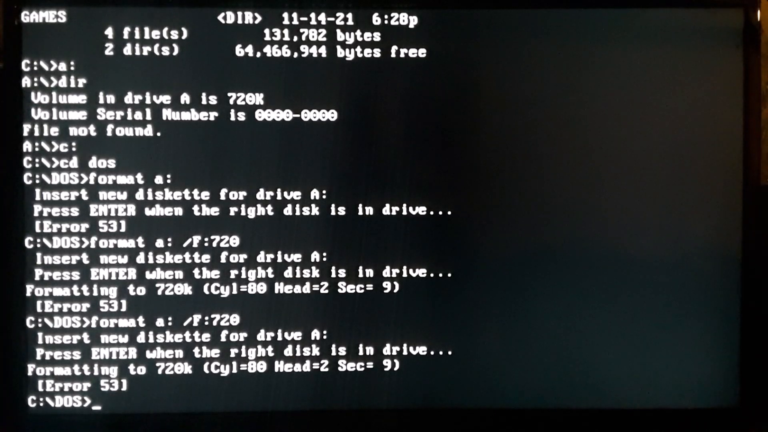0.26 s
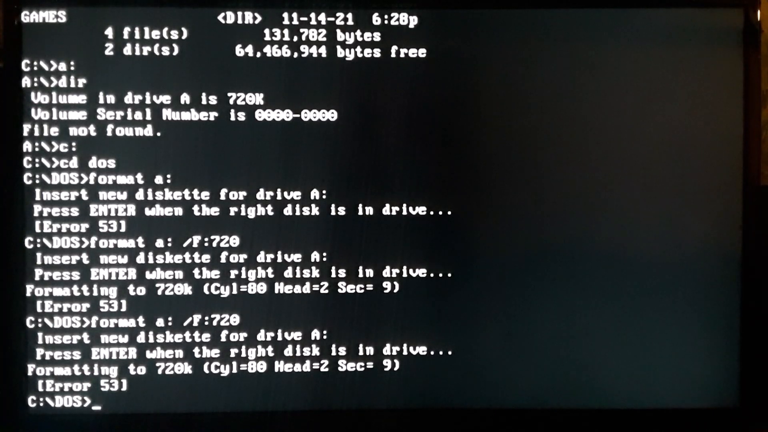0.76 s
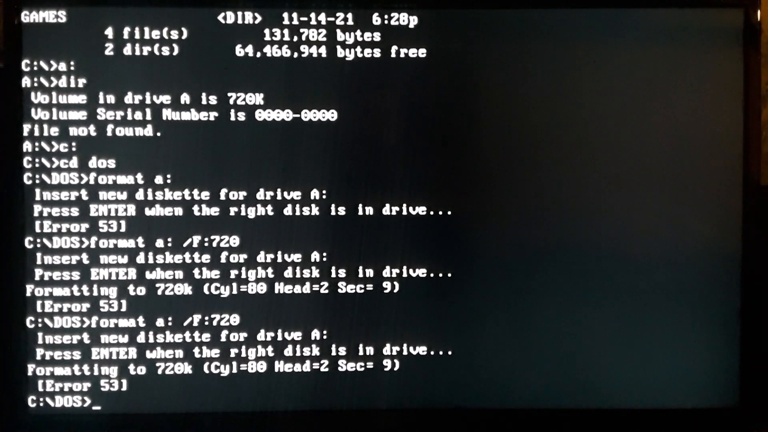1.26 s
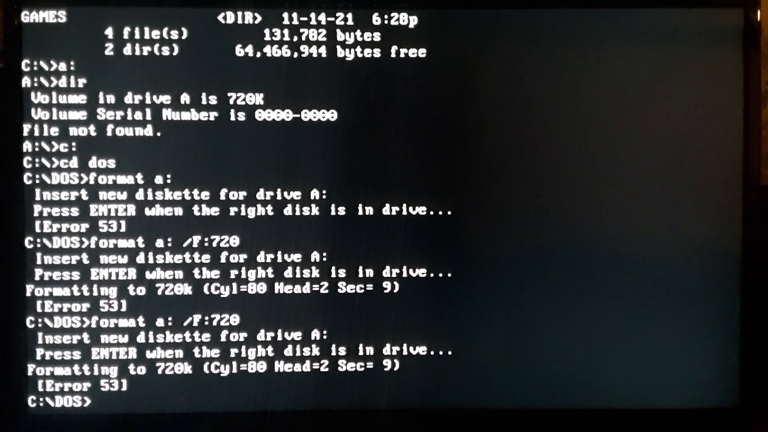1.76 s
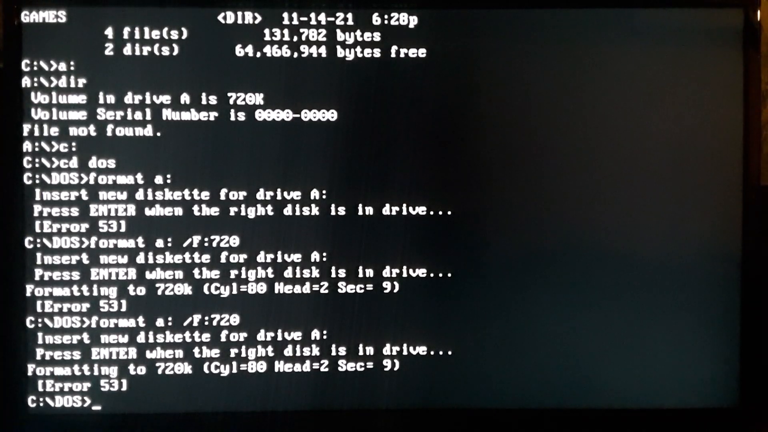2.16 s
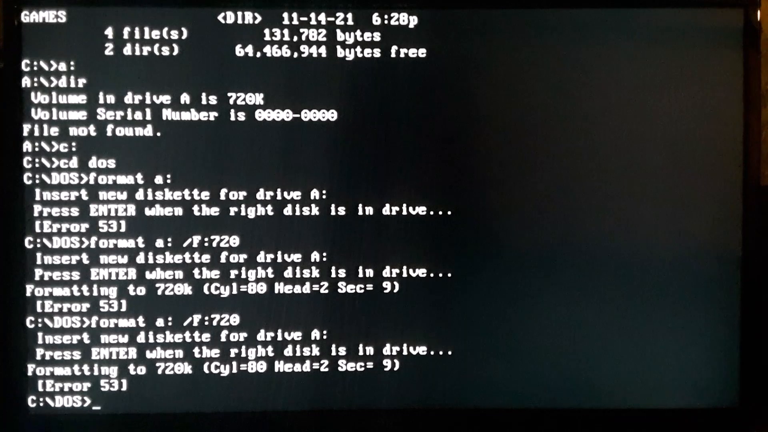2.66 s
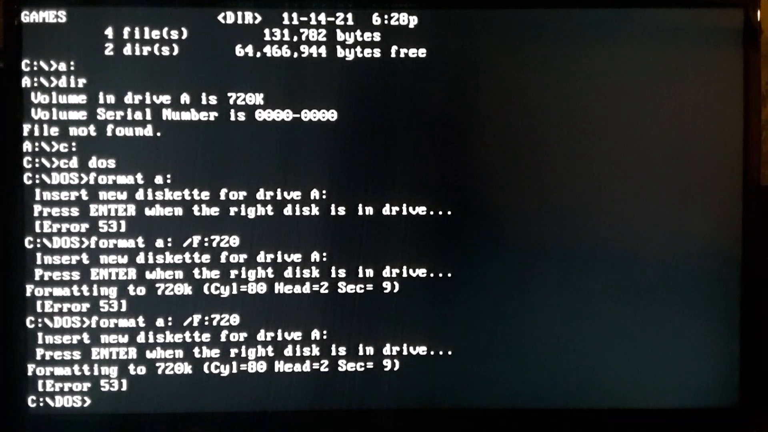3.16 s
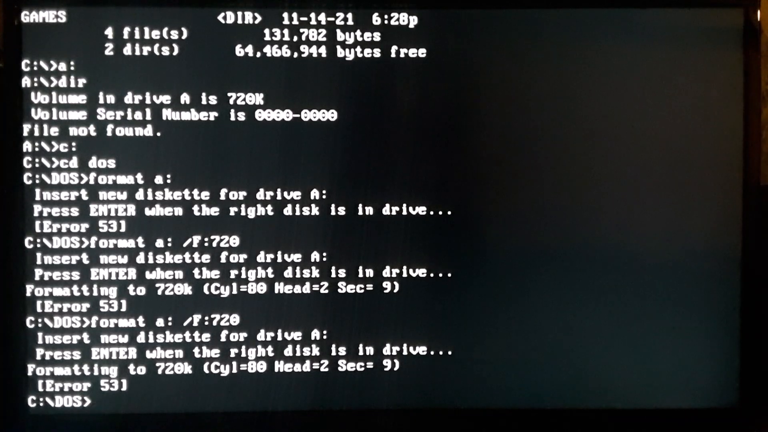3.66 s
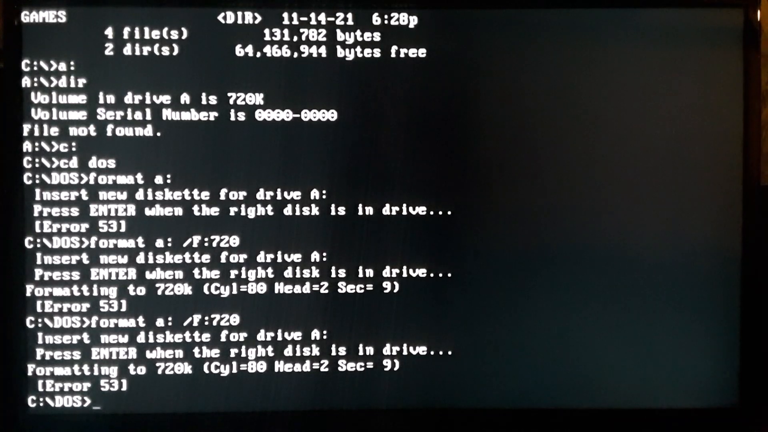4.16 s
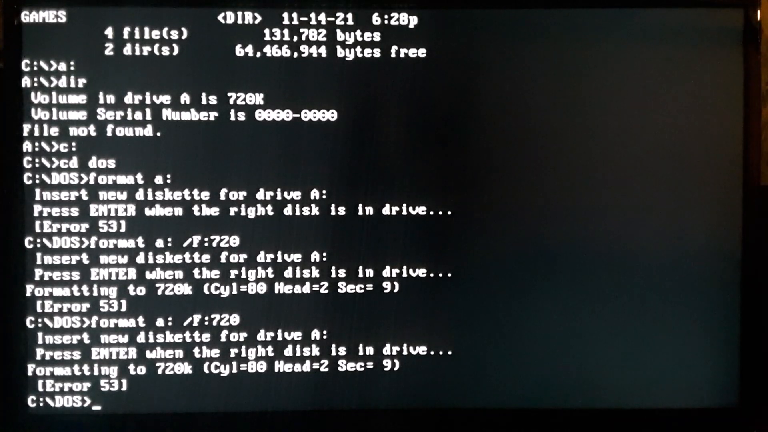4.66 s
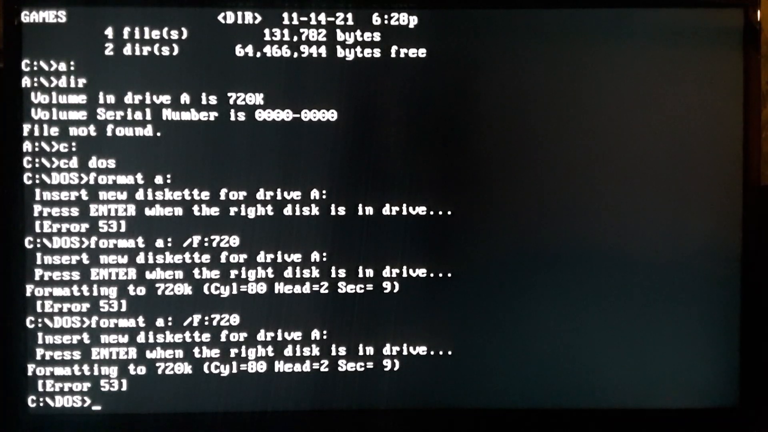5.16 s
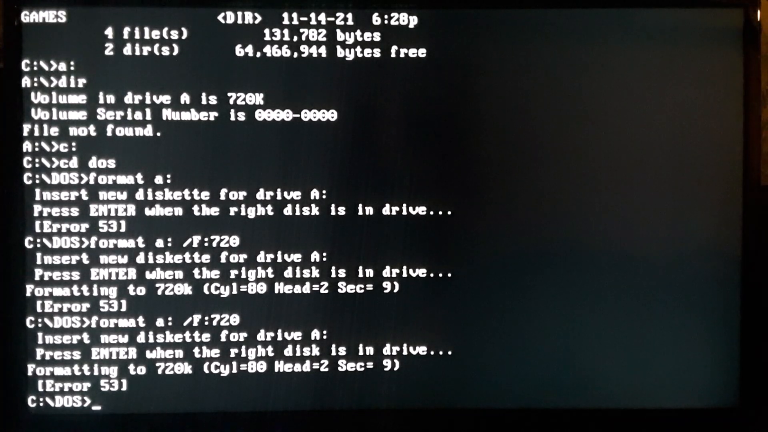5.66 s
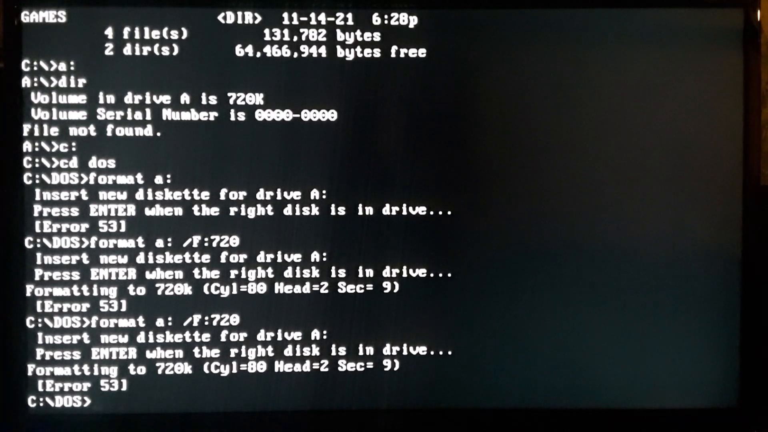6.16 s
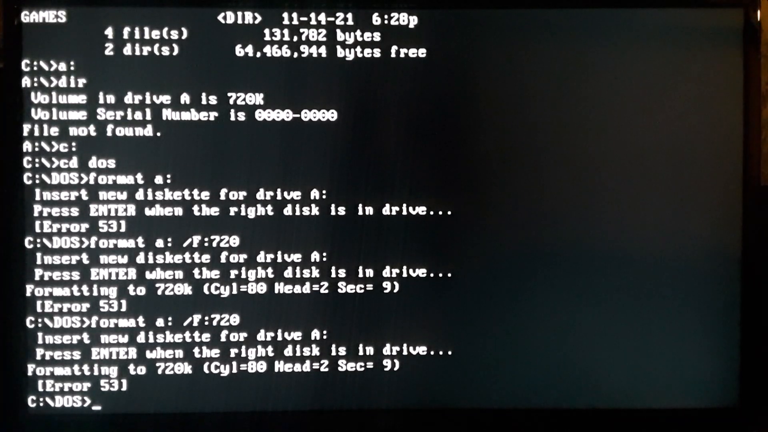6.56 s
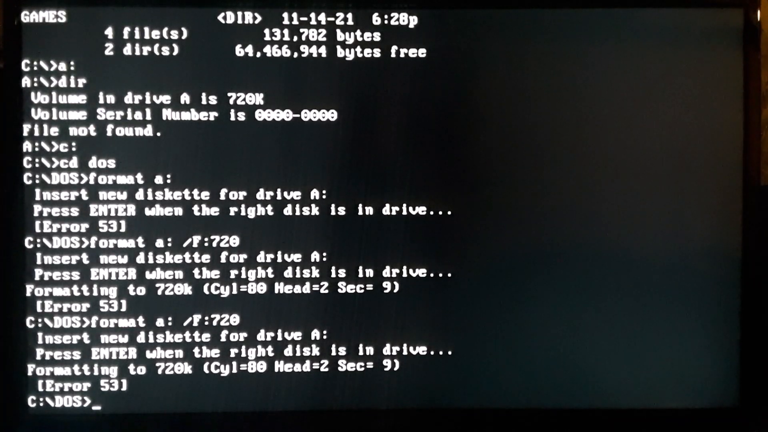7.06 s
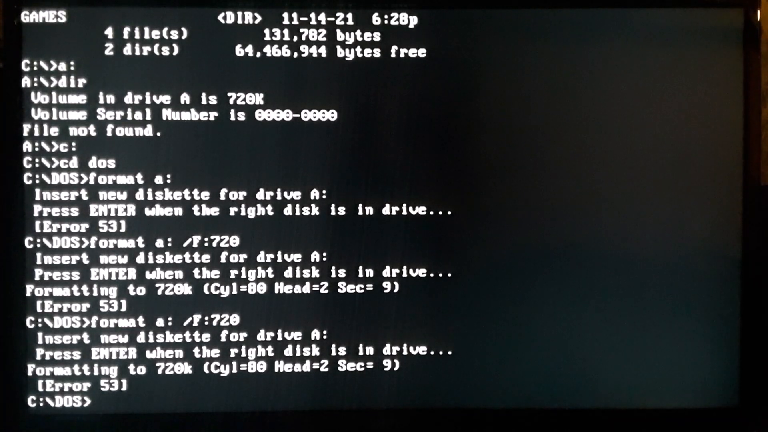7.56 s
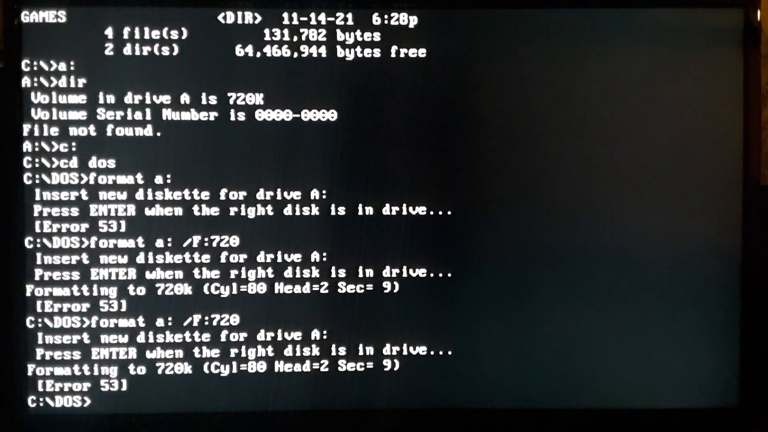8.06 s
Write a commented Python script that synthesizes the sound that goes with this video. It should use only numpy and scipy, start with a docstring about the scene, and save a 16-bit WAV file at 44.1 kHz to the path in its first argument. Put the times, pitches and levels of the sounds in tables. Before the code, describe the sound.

In a small room with a faint computer fan hum, a floppy drive snaps and releases its disk. The plastic shell is handled with separate clicks, light rubbing and dull bumps on the desk. Knocks and sliding grow busier as it goes back in, ending in a firm latch clack, the loudest sound, and a last small tick. Two spaced microphones place the drive a little to the right.

```python
"""A light click, then the sharp snap of a latch: a plastic floppy disk is ejected from a drive on a desk.
It is handled and pushed back in. Latches and edges knock in bursts of tiny impacts, plastic slides on
plastic and fingers in dense slips, and both excite the modes of drive case and disk shell.
The desk carries soft bumps, the small room reverberates and a computer fan hums below.
Two spaced microphones receive the sound; the drive stands nearer the right one."""
import sys
import numpy as np
from scipy import signal
from scipy.io import wavfile

SR = 44100
rng = np.random.default_rng(int(sys.argv[2]) if len(sys.argv) > 2 else 0)


def inscribe(sig):
    """Save sig as 16-bit PCM at rate SR to the path in sys.argv[1].

    A 1-D sig is mono; a 2-D sig holds one channel per row.
    Samples are clipped to [-1, 1] before scaling.
    """
    pcm = np.round(np.clip(np.atleast_2d(sig).T, -1, 1) * 32767)
    wavfile.write(sys.argv[1], SR, pcm.astype(np.int16))


N = 366030

# six bands (thud, body, clack, snap, click, sheen): lower f/Hz, upper f/Hz
BANDS = [(200, 500), (500, 1300), (1300, 2400), (2400, 4300), (4300, 7500), (7500, 17000)]
# knocks and latch snaps: t/s, level/dB, low/dB, treble/dB, sheen/dB, left minus right/dB,
# rattle time constant/s, ring f/Hz; low, treble and sheen are offsets from the level
IMPACTS = [(0.052, -35, -6.5, -36.5, -41, -0.5, 0.0048, 920), (0.093, -56, 0, -29, -16, 4, 0.0025, 1680),
           (0.139, -54, -13, -4, -23, -1, 0.0029, 790), (0.2531, -20, -11.5, 1.5, -6.5, -5.5, 0.0041, 3350),
           (0.262, -26.5, 0, -10, -25, 5, 0.0048, 940), (0.3612, -39.5, 2, -6.5, -16, 0, 0.0038, 900),
           (0.4222, -40.5, 9, -22.5, -29.5, 0.5, 0.0029, 947), (0.4928, -48, 4, -13, -22, -6, 0.0014, 1960),
           (1.0373, -55, 2.5, 2, -15, 3, 0.004, 720), (1.0654, -38.5, -4, -1, -8.5, -3.5, 0.0037, 4180),
           (1.4108, -15.5, -6.5, -3, -6, 2.5, 0.0015, 3080), (1.816, -36, -18, -16, -26, 2, 0.0021, 2000),
           (1.8484, -31, -18, -20, -24, 4.5, 0.0034, 2050),
           (2.2667, -33.5, -10, -9, -18, 7.5, 0.0023, 1880),
           (2.3079, -25, -11.5, -12.5, -18, 7, 0.0042, 1900),
           (2.3198, -37.5, -4.5, -7, -15, -2, 0.012, 2120), (2.3794, -22.5, -7.5, 2, -7, 7, 0.0024, 2402),
           (3.4281, -43, -10.5, -20, -9.5, 10.5, 0.002, 824),
           (4.0923, -70, 18.5, -17, -19, -5.5, 0.0038, 729),
           (4.3445, -45.5, -6, -5.5, -30.5, 1, 0.0073, 880),
           (4.4912, -43.5, 2, -21.5, -30, -2, 0.0079, 910), (4.5402, -42.5, -10, -19, -35, 2, 0.007, 870),
           (4.5695, -41.5, 3, -31, -36, 1, 0.0056, 2850),
           (4.673, -42.5, -3, -26.5, -40, -0.5, 0.0063, 1500),
           (4.8954, -48.5, -7, -12, -24.5, -3.5, 0.0077, 1170),
           (4.9624, -31.5, -12.5, -19, -39, 1, 0.0027, 1780),
           (5.001, -36.5, -6.5, -15.5, -27, -0.5, 0.0052, 3650),
           (5.2012, -54.5, -9, -18.5, -22, 1.5, 0.0053, 720),
           (5.5284, -39.5, -11, -13, -19.5, 5.5, 0.0048, 750),
           (5.54, -38.5, -11, -10.5, -18, -4, 0.0052, 2160), (5.5972, -34, -11, -21, -27, -2, 0.0096, 810),
           (5.6123, -36.5, -6, -15, -20, -3, 0.0052, 790), (5.8449, -48.5, 5, -19.5, -25, 0.5, 0.0087, 700),
           (5.9852, -60.5, -16, -0.5, -7, 0, 0.0053, 830), (6.2198, -58, -13, -4.5, -10, -1, 0.0048, 740),
           (6.2721, -45, -8, 5, -18, -4, 0.0043, 1900), (6.2913, -22, -13, -20.5, -28, 5, 0.0091, 790),
           (6.3025, -22.5, -7.5, -23.5, -27, -10.5, 0.0055, 886),
           (6.4622, -47.5, -19, -11, -21, 1, 0.0044, 2940), (6.546, -33, -14, -14, -26, 8, 0.0023, 2090),
           (6.6184, -45.5, -17, 9, -7, -2.5, 0.0037, 923), (6.7491, -40.5, -9, 3.5, -8, 0, 0.0032, 2070),
           (6.775, -31.5, -4.5, -16, -19, -1.0, 0.0031, 930),
           (6.9117, -51.5, -8, -9.5, -26, 6.5, 0.0057, 840),
           (7.2382, -11.5, -6.5, -6.5, -10.5, -3.0, 0.0049, 2870),
           (7.2483, -10.5, -6, -15.5, -18, -2, 0.0092, 1000),
           (7.2588, -19.5, -2, -14, -23, 2.5, 0.0072, 830),
           (7.666, -56.5, -4.5, -8, -20.5, -2.5, 0.004, 1916),
           (8.1733, -40, -16, -15, -22.5, 6, 0.0053, 1670)]
# sliding strokes: t/s, rise/s, hold/s, fall/s, level/dB, low/dB, treble/dB, sheen/dB, rasp f/Hz
FRICTION_STROKES = [(0.046, 0.047, 0.021, 0.17, -69.5, 12, -4, -22, 890),
                    (0.158, 0.06, 0.0099, 0.0047, -52.5, -9.5, -6.5, -12, 2000),
                    (0.213, 0.011, 0.037, 0.013, -41.5, -4.5, -3.5, -16, 880),
                    (0.364, .01, 0.056, 0.15, -60.5, 2.5, -9, -23, 890),
                    (0.475, 0.012, .002, .04, -55.5, -6.5, -9, -18, 2000),
                    (0.914, 0.045, .003, 0.13, -65.5, 0.5, -7.5, -14, 850),
                    (1.14, 0.097, 0.026, 0.018, -64, -6.5, -7, -27, 1940),
                    (1.235, 0.043, 0.1, 0.016, -48, -9, 4.5, -12, 3100),
                    (1.338, 0.027, 0.03, .012, -49.5, -13, 8, 5.5, 6550),
                    (1.738, 0.043, 0.013, 0.025, -59.5, -18, 11, 0.5, 2000),
                    (1.856, 0.013, .003, 0.086, -59, -17, 8, -1, 2120),
                    (1.884, 0.061, 0.313, .03, -67.5, -15, -10, -21, 2060),
                    (3.078, 0.052, 0.092, .03, -69, -8.5, 14, 7.5, 2000),
                    (3.182, 0.048, 0.0041, 0.094, -51.5, -16, 7, -3, 2620),
                    (3.209, 0.14, 0.068, 0.037, -63.5, -19, 10.5, 0.5, 6500),
                    (4.336, 0.0081, 0.0028, 0.33, -58, 6, -12, -24, 2000),
                    (4.49, 0.011, .003, 0.02, -55, -18, -18, -29, 2900),
                    (4.53, 0.016, .003, 0.39, -61, -8, -5.5, -28, 2000),
                    (4.663, 0.032, 0.0028, 0.16, -60, 0.5, -21, -28, 1900),
                    (4.754, 0.194, .003, .02, -67, 2, -4.5, -14, 1900),
                    (5.369, 0.053, .003, 0.1, -64.5, 7.5, -14.5, -16.5, 2070),
                    (5.491, 0.039, 0.065, .1, -56, -3.5, -5, -14, 2050),
                    (5.597, 0.084, 0.029, 0.21, -53, -0.5, -5.5, -17, 2140),
                    (5.916, .14, 0.0025, 0.07, -63.5, 4, -10.5, -11.5, 870),
                    (6.242, 0.053, 0.0054, 0.011, -40.5, -5.5, -7, -14, 1900),
                    (6.406, 0.083, .003, 0.064, -49.5, -7, -1, -11, 3020),
                    (6.515, 0.034, .003, 0.14, -44.5, -6.5, -9, -20, 1980),
                    (6.546, 0.032, 0.19, 0.094, -51.5, -8, 1, -11, 2960),
                    (6.803, .1, 0.039, 0.058, -65.5, 3, -12, -11.5, 2000),
                    (7.105, 0.12, 0.0024, .004, -57.5, -8, -10.5, -25, 2000)]
# colour common to all knocks: gain/dB in each band
IMPACT_COLOUR = [-9.5, -3, 1, -5, 3.5, 2]
# colour common to all strokes: gain/dB in each band
FRICTION_COLOUR = [-5, 1.5, 4, -5, -1.5, -1]
# weights of the low, treble and sheen offsets (rows) in each band (columns)
COLOUR_WEIGHTS = [[.9, 0.83, 0.15, 0.068, 0, 0], [0, 0.27, 0.18, 0.53, 0.77, 0], [0, 0, 0, 0, 0, 1]]
# shadowing at the left microphone: gain/dB in each band
LEFT_SHADOW = [-7.5, 0, -2, 0, -7.5, -3]
# modes of drive case and disk shell: f/Hz, gain/dB, T60/s
SHELL_MODES = [(333, -41, 0.014), (740, -33, 0.018), (918, -28, 0.021), (1002, -35.5, 0.049),
               (2076, -34, 0.0092), (2794, -37.5, 0.002), (4590, -55.5, 0.0027), (6160, -46, 0.0088)]
# bumps carried by the desk: t/s, level/dB, f/Hz, T60/s
DESK_BUMPS = [(0.257, -52, 150, 0.088), (1.414, -53.5, 138, 0.15), (2.382, -43.5, 101, 0.083),
              (2.569, -39.5, 149.5, 0.026), (2.812, -45.5, 85, 0.067), (2.834, -47, 112, 0.069),
              (3.037, -50.5, 235, 0.071), (3.43, -43, 302, 0.032), (4.096, -47.5, 130.6, 0.079),
              (4.096, -39, 403, 0.062), (5.619, -51, 135, 0.2), (6.302, -55, 142, 0.14),
              (7.253, -27, 328, 0.1), (7.27, -42, 134, 0.37)]
# soft squeaks: t/s, duration/s, f/Hz, level/dB
SQUEAK_TONES = [(.092, .035, 1700, -53), (.085, .05, 500, -52), (2.675, .11, 478, -53)]
# reverberation, one row a band: T60/s, gain/dB, left-right correlation
ROOM_DECAY = [(0.33, -3.5, 0.92), (.25, -3, 0.079), (0.27, -6, 0.04), (0.23, 2.5, 0.064), (0.2, -4.5, 0.07),
              (0.15, -1.5, 0.17)]
# air noise of the fan: f/Hz, relative spectral density/dB
FAN_SPECTRUM = [(15, -33.5), (30, -28.5), (70, -17), (200, -14.5), (370, -22.5), (600, -19), (900, -21.5),
                (1200, -30.5), (2000, -35.5), (3400, -40.5), (6000, -34.5), (7500, -50), (15000, -41.5),
                (17000, -44)]
# case resonances in the fan noise: f/Hz, bandwidth/Hz, level/dB
FAN_RESONANCES = [(210.7, 54, -75.5), (290, 25, -70), (757, 180, -63.5), (5657, 950, -76.5),
                  (1900, 340, -80.5)]
# fan noise at the two microphones: f/Hz, left-right correlation
FAN_CORRELATION = [(60, 0.54), (150, 0.95), (380, 0.77), (950, -0.11), (2380, 0.023), (5980, -0.087),
                   (15000, 0.95)]
# level of the whole background hum and hiss, sinking after the last loud snap: t/s, gain/dB
BACKGROUND_LEVEL = [(0, -1), (1.5, -3), (3, -1), (3.8, -2), (5, -1), (7.2, -1.5), (7.6, -4), (8.3, -7.5)]


def knocks():
    """Impact excitation: contacts build up, then die away exponentially. Force per band and side."""
    build_up_s, length = 0.0034, 3000
    force, t = np.zeros((6, 2, N + length)), np.arange(length) / SR
    for start, *colour_db, pan_db, rattle_s, hz in IMPACTS:
        envelope = np.where(t < build_up_s, (t / build_up_s) ** 2, np.exp((build_up_s - t) / rattle_s))
        rattle = envelope * micro_impacts(length, per_s=11000, spread_db=4.5)
        rattle = contact_resonance(rattle, hz, db=-25, t60=.009)
        sides = from_db([[pan_db / 2], [-pan_db / 2]])
        at = round((start - build_up_s / 2) * SR)
        force[:, :, at:at + length] += band_gains(*colour_db, IMPACT_COLOUR) * sides * rattle
    return force[..., :N]


def slides():
    """Sliding friction: dense slips under uneven pressure; each stroke swells, holds and fades."""
    uneven_db, fade_db = 2.2, 32
    force = np.zeros((6, 1, N))
    slips = micro_impacts(N, per_s=6000, spread_db=2.0) * from_db(uneven_db * drift(hz=36))
    for start, rise, hold, fall, *colour_db, hz in FRICTION_STROKES:
        corners = np.cumsum([0, rise, hold, fall]) * SR
        envelope = from_db(np.interp(np.arange(int(corners[-1])), corners, [-fade_db, 0, 0, -fade_db]))
        at = round(start * SR)
        span = slice(at, at + len(envelope))
        rasp = contact_resonance(envelope * slips[..., span], hz, db=-24.5, t60=0.0088)
        force[..., span] += band_gains(*colour_db, FRICTION_COLOUR) * rasp
    return force * from_db([[-1.2], [1.2]])   # louder on the right


def micro_impacts(count, per_s, spread_db):
    """Shot noise: random impulses of uneven size, each with its own sign in every band; rms 1."""
    sizes = from_db(spread_db * np.minimum(rng.exponential(1, count), 4))
    occurs = rng.random(count) < per_s / SR
    return unit_rms(sizes * occurs * rng.choice([-1, 1], (6, 1, count)))


def contact_resonance(force, hz, db, t60):
    """Resonance: the struck or rubbed part rings at its own pitch, in the band that contains it."""
    in_band = np.array([low <= hz < high for low, high in BANDS])[:, None, None]
    return force + in_band * from_db(db) * resonator(force, hz, t60)


def band_gains(db, low_db, treble_db, sheen_db, common_db):
    """Spectral shaping: level and colour add in decibels to give a contact its gain in each band."""
    offsets_db = np.dot([low_db, treble_db, sheen_db], COLOUR_WEIGHTS)
    return from_db(db + offsets_db + common_db)[:, None, None]


def shell(force):
    """Modal superposition: the force sounds directly and through the modes of case and disk."""
    direct = sum(bandpass(part, low, high, order=3) * np.sqrt(SR / 2 / (high - low))   # keeps its power
                 for part, (low, high) in zip(force, BANDS))
    modes = sum((-1) ** k * from_db(db) * resonator(direct, hz, t60)
                for k, (hz, db, t60) in enumerate(SHELL_MODES))
    return direct + modes


def desk_bumps():
    """Free vibration: the desk answers each impulse with a low damped sine."""
    bumps = np.zeros(N)
    for start, db, hz, t60 in DESK_BUMPS:
        impulse = from_db(db) * (np.arange(N) == round(start * SR))
        bumps += resonator(impulse, hz, t60)
    return bandpass(bumps, 65, 430, order=3)


def squeaks():
    """Amplitude modulation: each squeak is a pure tone that swells quickly and fades more slowly."""
    tones, t = np.zeros(N), np.arange(N) / SR
    for start, duration, hz, db in SQUEAK_TONES:
        progress = np.clip((t - start) / duration, 0, 1)
        tones += from_db(db) * np.sin(np.pi * progress ** .5) * np.sin(2 * np.pi * hz * t)
    return tones


def reverberation(force):
    """Diffuse field: dense reflections act as noise whose power, fed by the force, decays in each band."""
    reflected = np.zeros_like(force)
    fill = np.exp(-1 / (0.0013 * SR))   # the field builds up with a 1.3 ms time constant
    for k, (t60, db, correlation) in enumerate(ROOM_DECAY):
        drain = from_db(-120 / (t60 * SR))   # fraction of the power left after one sample
        supply = np.mean(force[k] ** 2, axis=0) + 1e-18
        power = signal.lfilter([1 - drain], [1, -drain], supply)
        power = signal.lfilter([1 - fill], [1, -fill], power)
        noise = stereo_pair(*rng.standard_normal((2, N)), correlation)
        reflected[k] = from_db(db) * np.sqrt(power / 2) * noise
    return reflected


def fan():
    """Aerodynamic sound: broad air noise, narrow case resonances and a wavering blade-passing tone."""
    blade_hz, blade_db = 230.3, -62.5
    air, edges = 0, 22 * 2 ** np.arange(0, 10, .5)   # half-octave bands
    white = rng.standard_normal((3, 2, N))
    for k, (low, high) in enumerate(zip(edges, edges[1:])):
        hz = np.sqrt(low * high)
        gain = from_db(at_frequency(FAN_SPECTRUM, hz) + 0.27 * drift(hz=7.4))
        noise = bandpass(white[k % 2], low, high, order=3)   # neighbouring bands are uncorrelated
        air += gain * stereo_pair(*noise, at_frequency(FAN_CORRELATION, hz))
    hum = from_db(-61) * unit_rms(air)
    for hz, width, db in FAN_RESONANCES:
        noise = bandpass(white[2], hz - width / 2, hz + width / 2)
        hum += from_db(db) * unit_rms(stereo_pair(*noise, at_frequency(FAN_CORRELATION, hz)))
    cycles = np.cumsum(blade_hz + 1.76 * drift(hz=2.8)) / SR
    hum += from_db(blade_db + 0.83 * drift(hz=7.4)) * np.sin(2 * np.pi * cycles)
    return hum * from_db([[-.6], [.6]])


def resonator(x, hz, t60):
    """Damped oscillator: a unit impulse starts a sine of amplitude 1 that falls 60 dB in t60 seconds."""
    r, w = from_db(-60 / (t60 * SR)), 2 * np.pi * hz / SR
    return signal.lfilter([0, np.sin(w)], [1, -2 * r * np.cos(w), r * r], x + 1e-18)


def stereo_pair(mid, side, correlation):
    """Partial coherence: sum and difference of two independent noises give left and right."""
    return np.sqrt(1 + correlation) * mid + np.sqrt(1 - correlation) * side * [[1], [-1]]


def drift(hz):
    """Slow random fluctuation: noise of rms 1, low-passed at the given frequency."""
    step = 40   # samples between computed points
    r = np.exp(-2 * np.pi * hz * step / SR)
    slow = signal.lfilter([1], [1, -2 * r, r * r], rng.standard_normal(N // step + 2002))[2000:]
    return np.interp(np.arange(N) / step, np.arange(len(slow)), unit_rms(slow))


def bandpass(x, low, high, order=2):
    """Butterworth band-pass, edges in Hz."""
    return signal.sosfilt(signal.butter(order, [low, high], "band", fs=SR, output="sos"), x)


def at_frequency(points, hz):
    """Interpolation on a logarithmic frequency axis."""
    frequencies, values = np.transpose(points)
    return np.interp(np.log(hz), np.log(frequencies), values)


def unit_rms(x):
    """Normalisation to rms 1."""
    return x / np.sqrt(np.mean(x ** 2) + 1e-20)


def from_db(db):
    """Decibels to amplitude ratio."""
    return 10 ** (np.asarray(db) / 20)


def scene():
    """Superposition at two microphones; the contacts reach the farther, left one weaker and later."""
    left_lag_s = .00033
    force = knocks() + slides()
    force[:, 0] *= from_db(LEFT_SHADOW)[:, None]
    reflected = reverberation(force)
    force[:, 0] = np.roll(force[:, 0], round(left_lag_s * SR), axis=1)
    background_db = np.interp(np.arange(N) / SR, *np.transpose(BACKGROUND_LEVEL))
    return shell(force + reflected) + desk_bumps() + squeaks() + from_db(background_db) * fan()


def record(dry):
    """Soft saturation rounds the highest peaks; a steep low-pass removes the top of the spectrum."""
    ceiling, stopband_hz = .95, 16850
    rounded = ceiling * np.tanh(dry / ceiling)
    return signal.sosfilt(signal.cheby2(20, 70, stopband_hz, fs=SR, output="sos"), rounded)


dry = scene()
out = record(dry)
inscribe(out)
```